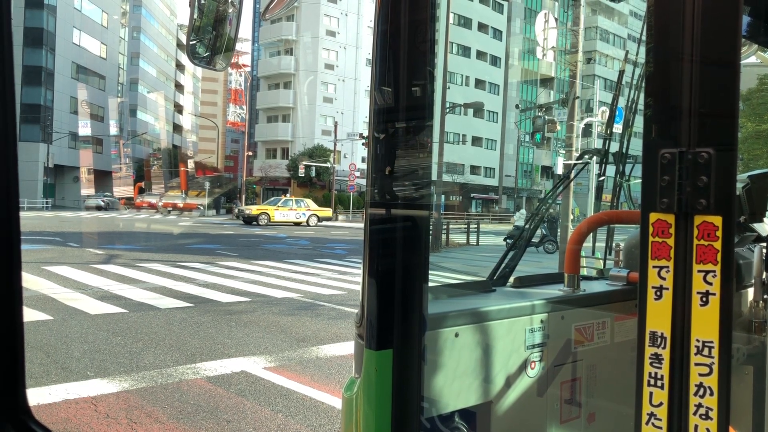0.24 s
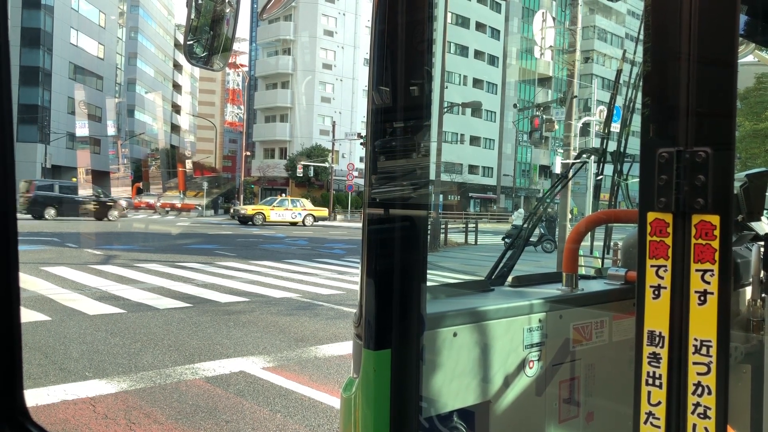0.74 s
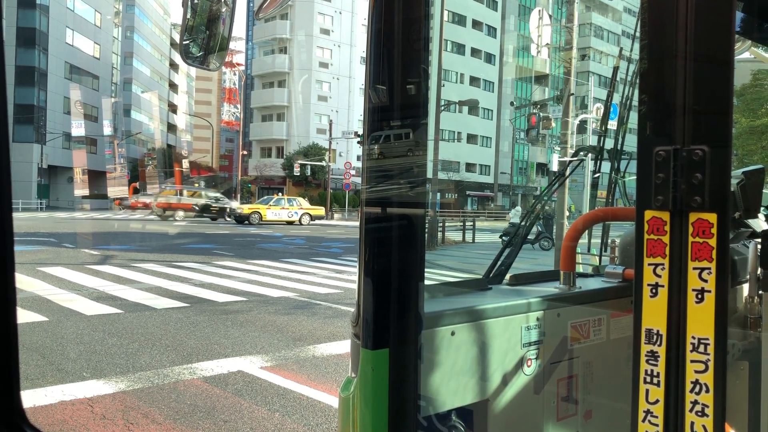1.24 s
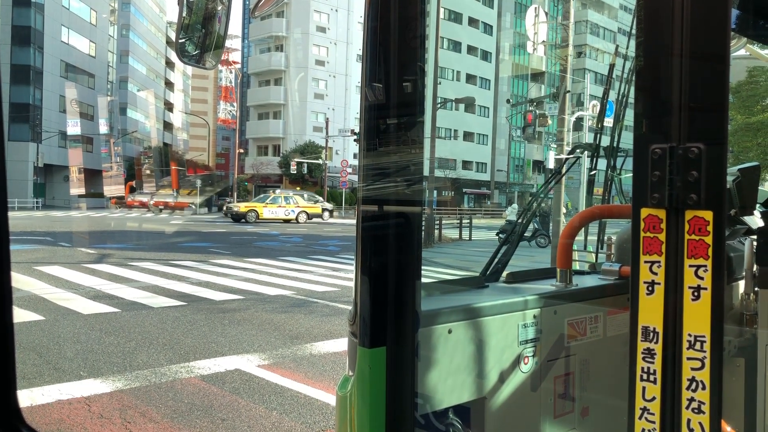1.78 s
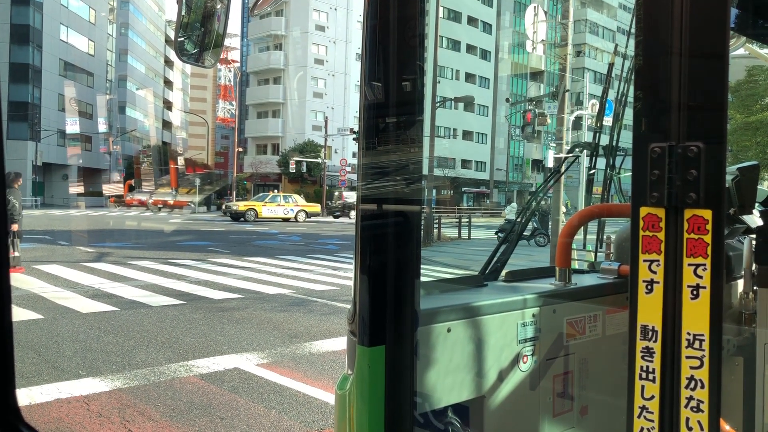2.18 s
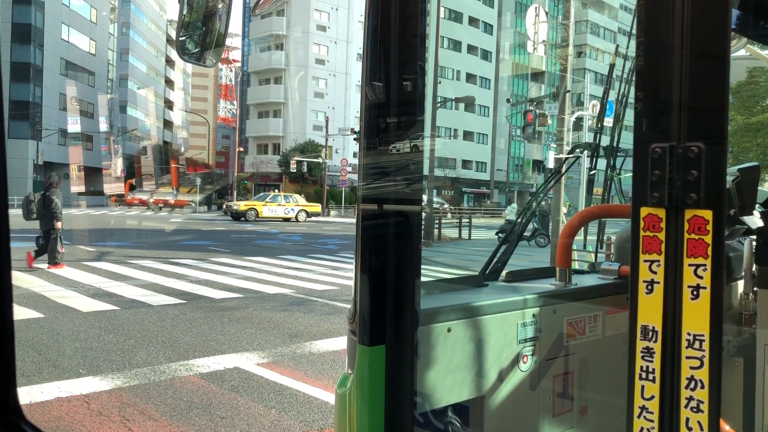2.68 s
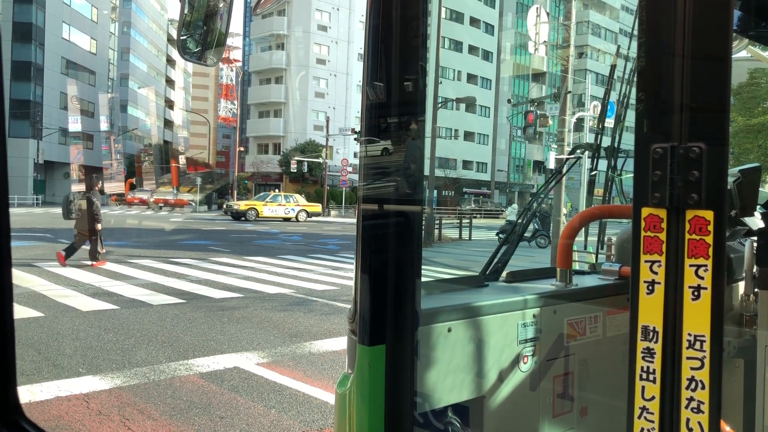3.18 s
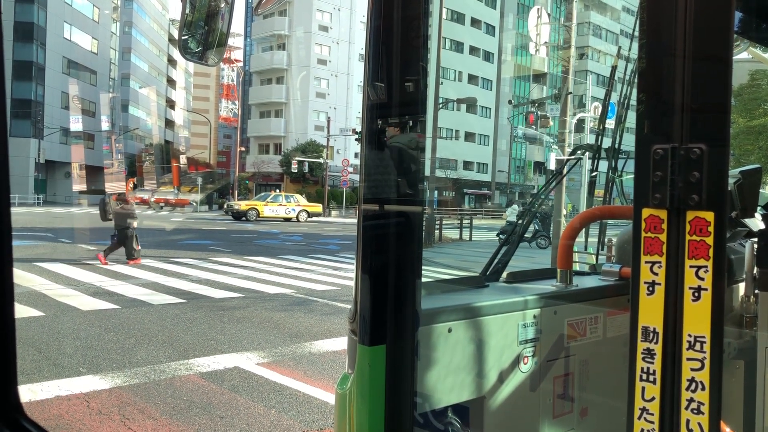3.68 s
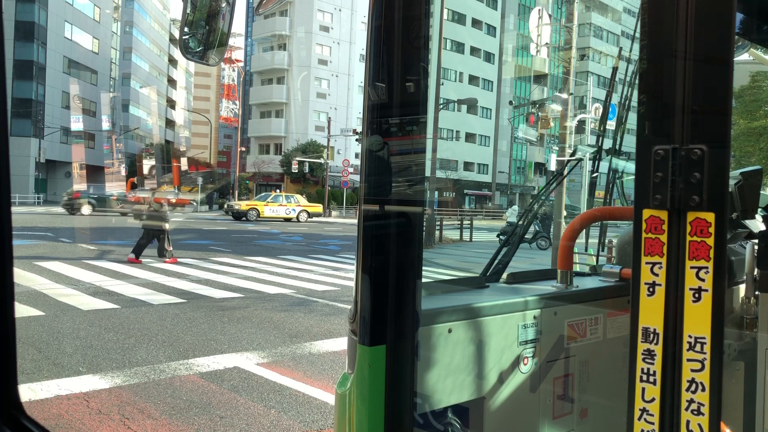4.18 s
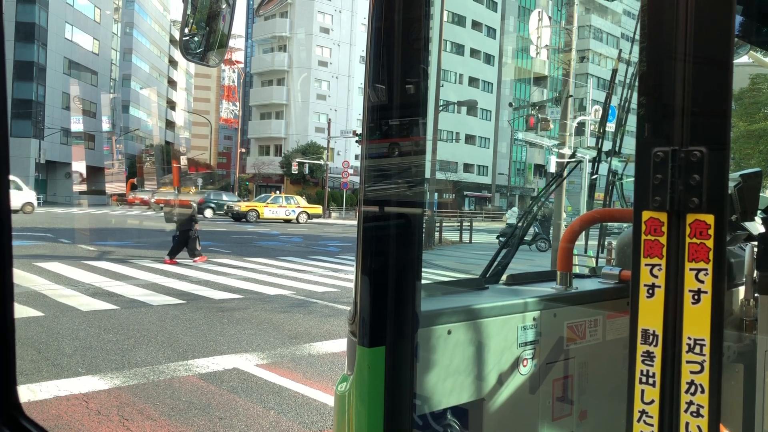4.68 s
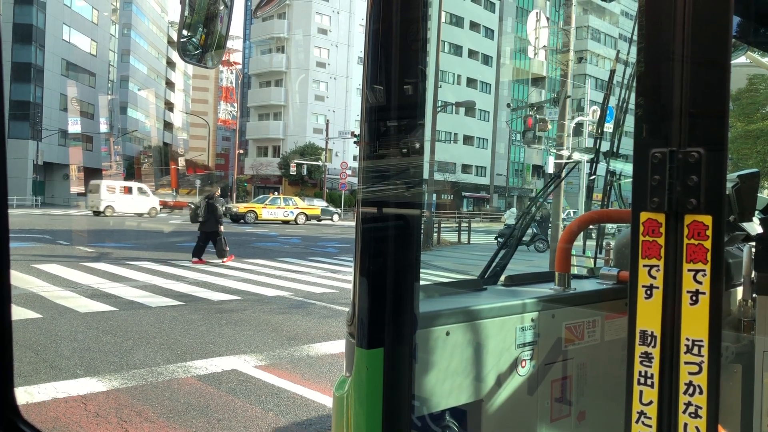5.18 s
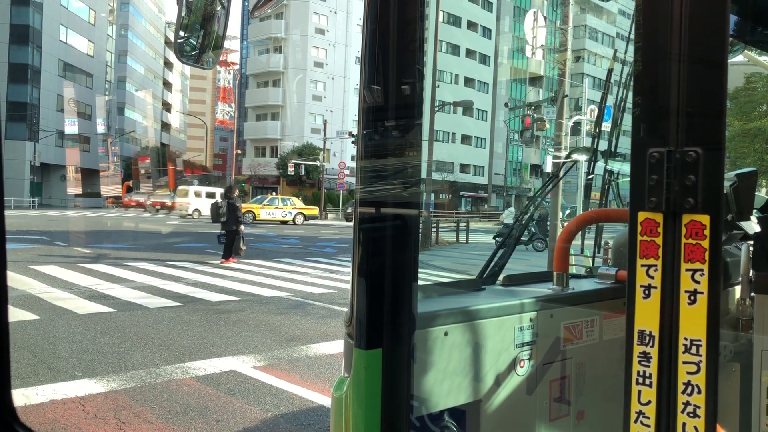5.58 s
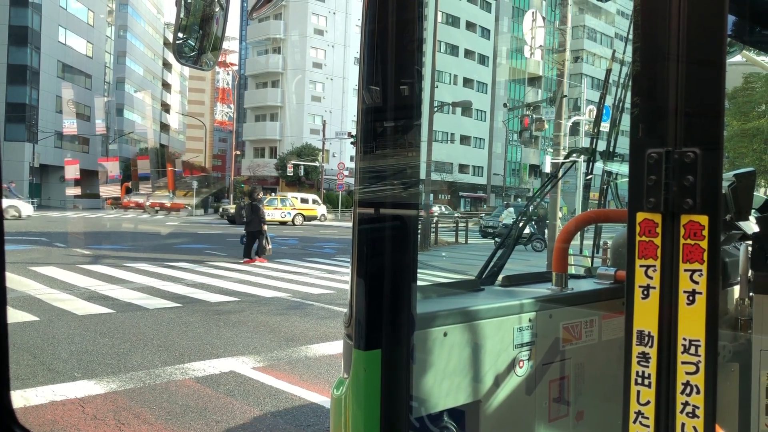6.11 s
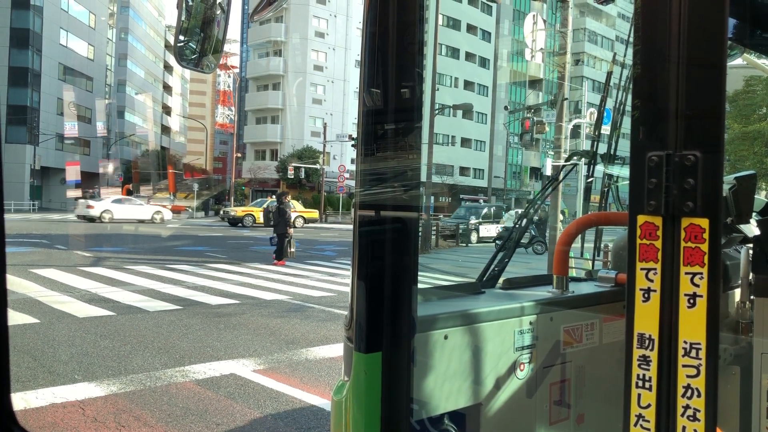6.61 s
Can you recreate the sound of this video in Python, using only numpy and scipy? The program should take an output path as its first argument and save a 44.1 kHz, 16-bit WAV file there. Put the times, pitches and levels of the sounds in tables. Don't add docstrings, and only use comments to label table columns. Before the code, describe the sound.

Inside a stationary bus, a droning diesel rattles under airy hiss while cars hum past, loose trim squeaks, and a foot scuffs then thuds.

```python
import sys
import numpy as np
from scipy import signal
from scipy.fft import rfft, irfft
from scipy.io import wavfile
from scipy.ndimage import uniform_filter1d

SR = 44100
rng = np.random.default_rng(int(sys.argv[2]) if len(sys.argv) > 2 else 0)


def ratio(d):
    e = np.asarray(d, float) / 20
    return 10 ** e


def generate_wav(sig):
    pcm = np.round(np.clip(np.atleast_2d(sig).T, -1, 1) * 32767).astype(np.int16)
    wavfile.write(sys.argv[1], SR, pcm)


N = 302085


def evened(x):
    return x / np.sqrt(np.mean(x ** 2) + 1e-20)


def add(mix, start_s, sound):
    part = mix[round(start_s * SR):][:len(sound)]
    part += sound[:len(part)]


def drift(top_hz):
    hz = np.fft.rfftfreq(N, 1 / SR)
    gain = (hz > 0) / (1 + (hz / top_hz) ** 4)
    return evened(irfft(rfft(rng.standard_normal(N)) * gain, N))


def noise(colour, size, patchy_db, peaks=()):
    hz = np.fft.rfftfreq(size, 1 / SR)
    real, imaginary, patches = rng.standard_normal((4 * N // size + 9, len(hz), 3)).T
    for axis in (0, 1):
        patches = uniform_filter1d(patches, size=6, axis=axis, mode="wrap")
    point_hz, point_db = np.transpose(colour)
    colour_db = np.interp(np.log(hz + 1), np.log(point_hz + 1), point_db, right=-90)
    for peak_hz, width_hz, peak_db in peaks:
        colour_db = colour_db + peak_db / (1 + (2 * (hz - peak_hz) / width_hz) ** 2)
    spectra = (real + 1j * imaginary) * ratio(colour_db[:, None] + patchy_db * evened(patches))
    sound = signal.istft(spectra, nperseg=size, noverlap=3 * size // 4)[1]
    return evened(sound[size:N + size])


def ring(modes, length_s, rise_s):
    t = np.arange(round(length_s * SR)) / SR
    partials = sum(ratio(db - 60 * t / t60) * np.sin(2 * np.pi * hz * t) for hz, db, t60 in modes)
    return partials * (1 - np.exp(-t / rise_s))


def fuzzy_tone(hz, width_hz, length_s):
    count, settling = round(length_s * SR), 2000
    wobble = rng.standard_normal((count + settling, 2)) @ [1, 1j]
    wobble = signal.lfilter(*signal.butter(2, width_hz / 2, fs=SR), wobble)[settling:]
    carrier = np.exp(2j * np.pi * hz * np.arange(count) / SR)
    return evened((wobble * carrier).real)


def firing_turns():
    firing_hz, first_firing_s = 19.168, .022
    return np.cumsum(firing_hz * (1 + .0006 * drift(1.5))) / SR - first_firing_s * firing_hz


def lag(order):
    return .204 * order - .024 * order ** 2 - .359


# multiple of the firing rate, level in dB rms.
ENGINE_ORDERS = [(1, -75), (2, -48), (3, -42), (4, -60), (5, -42), (6, -47), (7, -29), (8, -40), (9, -53),
                 (10, -46), (11, -41), (12, -47), (13, -58), (14, -42), (15, -58), (16, -52), (17, -68),
                 (18, -58), (19, -59), (20, -58), (21, -55), (22, -60), (23, -76), (24, -57), (25, -59),
                 (26, -77)]


def firing_orders(turns):
    waver_db = [1.16 * drift(4.5) for _ in range(3)]
    boom = np.zeros(N)
    for order, db in ENGINE_ORDERS:
        level_db = db + (order != 7) * waver_db[int(order) % 3]
        boom += ratio(level_db) * np.cos(2 * np.pi * (order * turns - lag(order)))
    pump_order, pump_db, in_step_s = 13.959, -44, .57
    in_step = turns[round(in_step_s * SR)]
    pump_turns = pump_order * (turns - in_step) + 14 * in_step - lag(14)
    return np.sqrt(2) * (boom + ratio(pump_db) * np.cos(2 * np.pi * pump_turns))


# frequency in Hz, level in dB, decay time t60 in seconds.
BLOCK_MODES = [(540, -50, .08), (670, -51, .08), (925, -48, .07), (1060, -50, .06), (1342, -54, .07),
               (1530, -56, .06), (2950, -62, .03)]


def knock(fires):
    return ratio(3) * signal.oaconvolve(fires, ring(BLOCK_MODES, .2, rise_s=0.00093))[:N]


# delay in seconds, level in dB.
VALVE_STROKES = [
    (0, 2.5),
    (.004, -5),
    (.0105, -9),
    (.015, -5),
    (.026, -13),
]
# frequency in Hz, density in dB per Hz.
CLATTER_COLOUR = [(400, -9), (1000, -1), (2000, -5.5), (3000, -7.5), (4500, -15), (6500, -16.5),
                  (9000, -19), (11000, -28), (16000, -28)]
# frequency in Hz, width in Hz, height in dB.
TAPPET_PEAKS = [(3000, 310, 4), (4200, 300, 5.5), (6200, 800, 3), (9500, 700, 2.5)]


def clatter(fires):
    t = np.arange(4000) / SR
    strokes = np.zeros(6000)
    for delay_s, db in VALVE_STROKES:
        add(strokes, delay_s, ratio(db - 60 * t / 0.11) * (1 - np.exp(-t / 0.00091)))
    bursts = signal.oaconvolve(fires, strokes)[:N]
    return ratio(-54) * evened(bursts * noise(CLATTER_COLOUR, size=512, patchy_db=0.0, peaks=TAPPET_PEAKS))


def engine():
    turns = firing_turns()
    fires = np.diff(np.floor(turns), prepend=np.floor(turns[0])) * ratio(1.2 * drift(15))
    return firing_orders(turns) + knock(fires) + clatter(fires)


# frequency in Hz, density in dB per Hz.
ROAR_COLOUR = [(26, -27), (40, -5.5), (100, -4), (125, -8), (190, 0.5), (260, -7), (320, -13.5), (640, -17),
               (820, -18), (950, -17.5), (1600, -24.5), (2100, -31), (3150, -31), (3550, -39.5)]
# frequency in Hz, width in Hz, height in dB.
CABIN_PEAKS = [(320, 11, 0.5), (463, 42, 5), (500, 19, -6), (3380, 200, 0), (520, 92, 0.5), (648, 52, -5),
               (688, 24, -1.5), (810, 29, -1), (880, 42, 2), (1110, 42, 1.5), (1308, 17, -4.5),
               (1380, 24, -2), (1500, 65, 1), (2134, 63, 3.5), (2914, 370, 3.5), (3220, 85, -5),
               (4216, 80, 2), (4940, 70, 2)]
# frequency in Hz, density in dB per Hz.
HISS_COLOUR = [(2500, -8.5), (4000, 3.5), (6000, -5), (9000, -10), (11500, -14), (14000, -12), (15500, -11),
               (17000, -27)]


def air():
    swell_db = 0.18 * drift(0.99)
    roar = noise(ROAR_COLOUR, size=4096, patchy_db=0.9, peaks=CABIN_PEAKS)
    hiss = noise(HISS_COLOUR, size=512, patchy_db=0.16)
    return ratio(-32.5 + swell_db) * roar + ratio(-57 + 1.5 * swell_db) * hiss


# frequency in Hz, width in Hz, level in dB rms.
BLOWER_TONES = [(344.3, 2, -56), (688, 5, -57), (902, 8, -61), (942, 8, -61)]


def blower():
    return sum(ratio(db) * fuzzy_tone(hz, width_hz, N / SR) for hz, width_hz, db in BLOWER_TONES)


# nearest moment in seconds, frequency there in Hz, glide in Hz per second,
# level in dB rms, time from nearest to half amplitude in seconds.
PASSING_CARS = [
    (.4, 96, -7.5, -34, 0.34),
    (1.9, 84.5, -4, -36, 0.49),
    (2.15, 71, 3, -40, .12),
    (3.051, 79.5, 15.5, -42, .25),
    (3.15, 87.5, 20, -34, 0.26),
    (3.92, 101.5, 18, -34, .2),
    (4.45, 97.9, -27.5, -33, 0.163),
    (5.35, 70, 1, -33, .35),
    (6.17, 92, -19.5, -45, 0.16),
    (6.6, 74, 8, -42, .25),
]


def traffic():
    out = np.zeros(N)
    for nearest_s, hz, glide, db, half_s in PASSING_CARS:
        heard_s = 3 * half_s
        t = np.arange(max(-heard_s, -nearest_s), heard_s, 1 / SR)
        phase = 2 * np.pi * np.cumsum(hz + glide * t) / SR
        near = np.cos(np.pi / 2 * t / heard_s) / (1 + (t / half_s) ** 2)
        hum = np.sin(phase) + ratio(-20) * np.sin(2 * phase)
        add(out, nearest_s + t[0], np.sqrt(2) * ratio(db) * near * hum)
    return out


# lag in seconds, frequency in Hz, width in Hz, level in dB, ring in seconds.
RELAY_CONTACTS = [
    (0, 15400, 700, -61, .035),
    (.006, 15200, 500, -65, .035),
]


def indicator_relay():
    out = np.zeros(N)
    first_s, every_s, length_s = .041, .3554, .08
    t = np.arange(round(length_s * SR)) / SR
    for k in range(20):
        lag_s, hz, width_hz, db, ring_s = RELAY_CONTACTS[k % 2]
        decay_db = 60 * t / .3 + 60 * np.maximum(t - ring_s, 0) / .1
        chatter = ratio(db - decay_db) * np.minimum(t / .007, 1)
        add(out, first_s + k * every_s + lag_s, chatter * fuzzy_tone(hz, width_hz, length_s))
    return out


# start in seconds, frequency in Hz, level in dB, length in seconds.
TRIM_CHIRPS = [
    (.565, 7100, -62, .04),
    (.57, 10500, -72, .04),
    (.70, 9700, -71, .03),
    (.70, 10400, -67, .09),
    (.825, 10400, -69, .05),
    (.88, 10450, -75, .5),
    (1.15, 9550, -76, .45),
    (6.10, 15000, -69, .04),
    (6.28, 14900, -69, .03),
]
# start in seconds, frequency in Hz, level in dB, length in seconds.
METAL_SQUEAKS = [
    (.76, 11600, -77, .42),
    (5.925, 15050, -61, .055),
    (6.005, 15050, -68, .06),
    (6.01, 13250, -71, .05),
    (6.365, 14200, -71, .015),
]
# start in seconds, frequency in Hz, width in Hz, level in dB, length in seconds.
SHOE_SCUFFS = [
    (2.35, 12000, 7000, -66, .27),
    (2.363, 6020, 3000, -62.5, 0.34),
    (2.44, 12500, 4000, -63, .014),
]


def rubbing():
    rows = []
    for table, sharpness in ((METAL_SQUEAKS, 110), (TRIM_CHIRPS, 24)):
        for start_s, hz, db, length_s in table:
            rows.append((start_s, hz, hz / sharpness, db, length_s))
    rows.extend(SHOE_SCUFFS)
    out = np.zeros(N)
    for start_s, hz, width_hz, db, length_s in rows:
        squeak = fuzzy_tone(hz, width_hz, length_s)
        add(out, start_s, ratio(db) * squeak * signal.windows.tukey(len(squeak), .4))
    grit_db = 1
    return out * ratio(grit_db * drift(30))


# start in seconds, level in dB.
THUMP_BLOWS = [
    (2.457, 1.5),
    (2.481, -5),
    (2.515, -11),
]
# frequency in Hz, level in dB, decay time t60 in seconds.
PANEL_MODES = [(95, -24, .3), (160.5, -7.5, 0.28), (185.3, -4.5, 0.17), (231, -14, 0.1), (285, -20, 0.07),
               (475, -23.5, .06), (620, -26, 0.068)]


def thump():
    out = np.zeros(N)
    length_s = .2
    t = np.arange(round(length_s * SR)) / SR
    fade = signal.windows.tukey(2 * len(t), .5)[len(t):]
    for start_s, db in THUMP_BLOWS:
        panel = ring(PANEL_MODES, length_s, rise_s=0.0088) * fade
        rattle = ratio(-33 - 60 * t / .16) * np.minimum(t / .024, 1) * fuzzy_tone(1700, 1800, length_s)
        add(out, start_s, ratio(db) * (panel + rattle))
    return out


def cabin(x):
    t60, wet = .2, .26
    t = np.arange(round(t60 * SR)) / SR
    signs = rng.choice([-1., 1.], len(t))
    tail = signs * (rng.random(len(t)) < .05) * ratio(-60 * t / t60)
    tail = signal.lfilter(*signal.butter(2, 450, "high", fs=SR), tail / np.linalg.norm(tail))
    return x + wet * signal.oaconvolve(x, tail)[:N]


def scene():
    reverberant = cabin(engine() + air() + thump())
    direct = blower() + traffic() + indicator_relay() + rubbing()
    return (reverberant + direct)[None]


def top_cut(x):
    return signal.sosfilt(signal.butter(12, 16800, fs=SR, output="sos"), x)


def record(dry):
    high = signal.sosfilt(signal.butter(3, 33, "high", fs=SR, output="sos"), dry)
    edge = signal.firwin(1001, 15780, window=("kaiser", 9), fs=SR)
    padded = np.pad(high, ((0, 0), (500, 500)), "reflect")
    limited = signal.oaconvolve(padded, edge[None], "valid")
    fade = np.minimum(np.arange(N, 0, -1) / 80, 1)
    return top_cut(fade * limited)


dry = scene()
out = record(dry)
generate_wav(out)
```